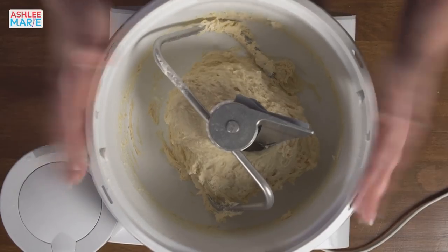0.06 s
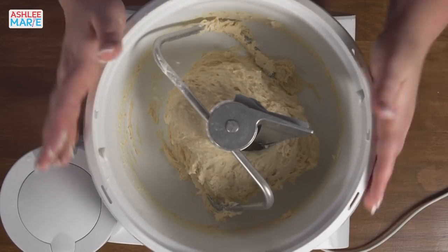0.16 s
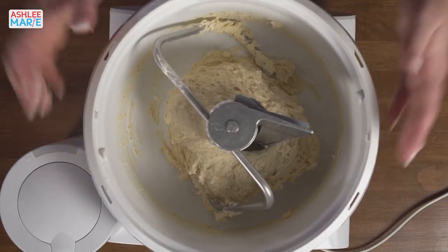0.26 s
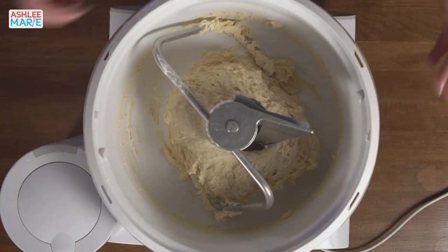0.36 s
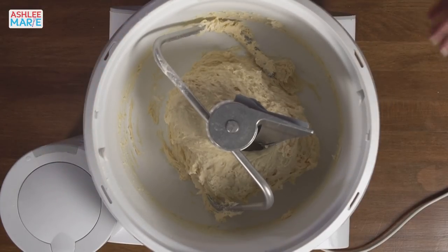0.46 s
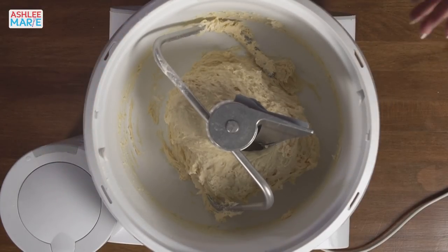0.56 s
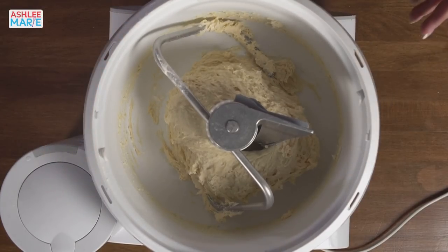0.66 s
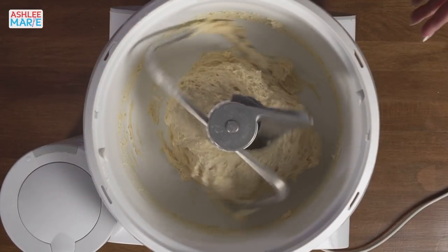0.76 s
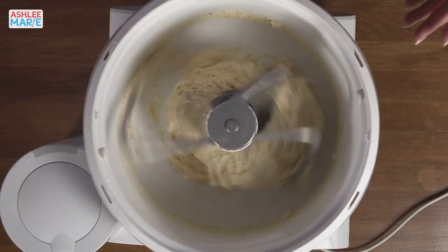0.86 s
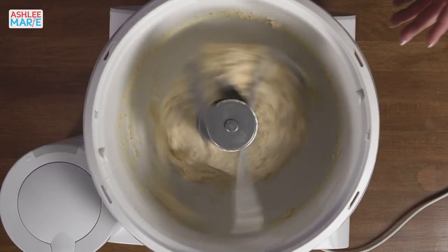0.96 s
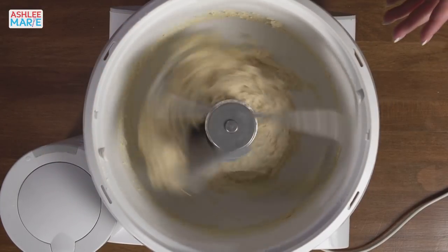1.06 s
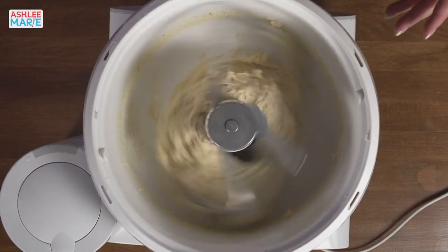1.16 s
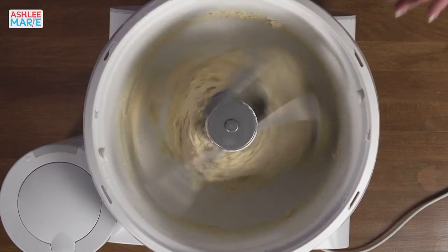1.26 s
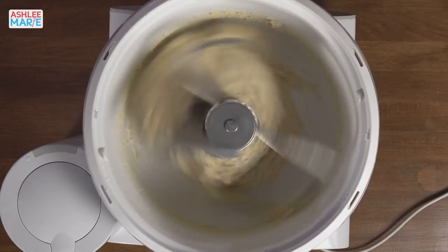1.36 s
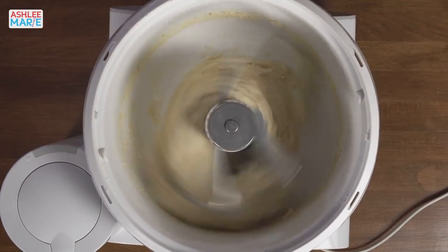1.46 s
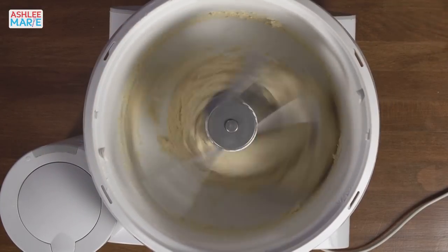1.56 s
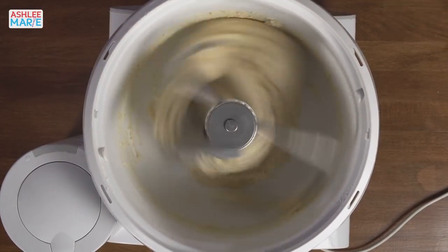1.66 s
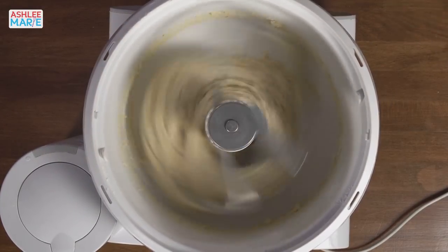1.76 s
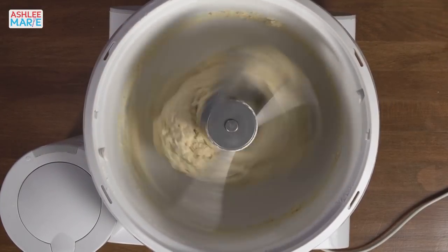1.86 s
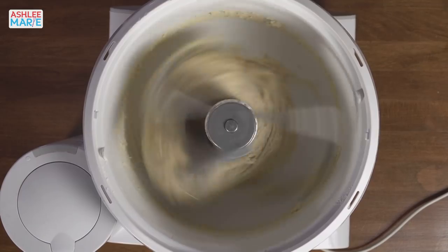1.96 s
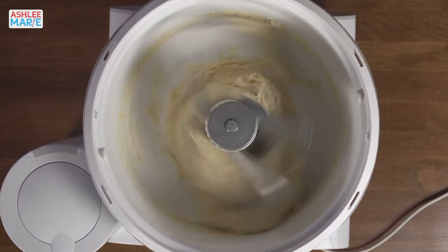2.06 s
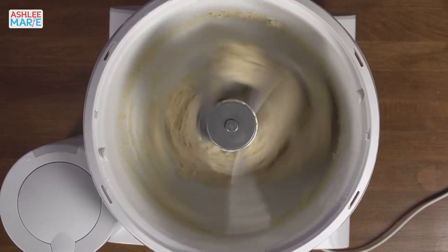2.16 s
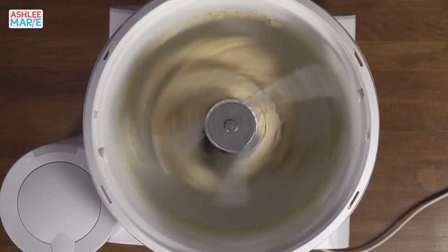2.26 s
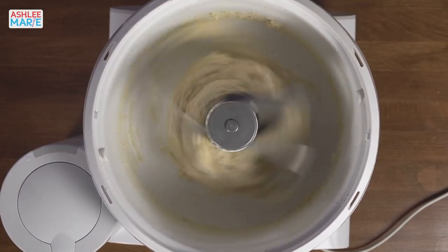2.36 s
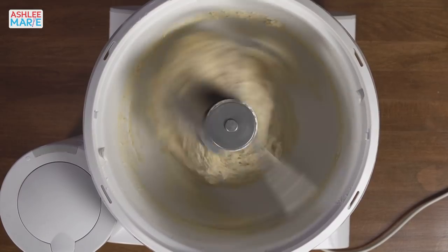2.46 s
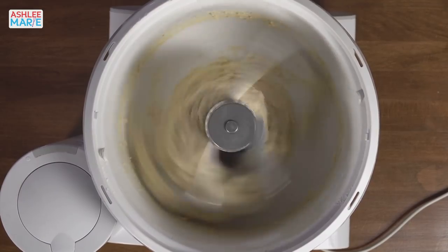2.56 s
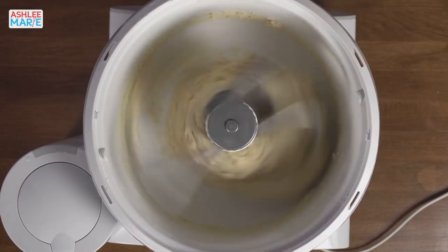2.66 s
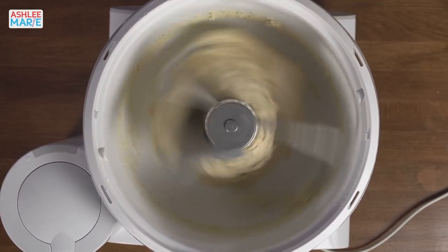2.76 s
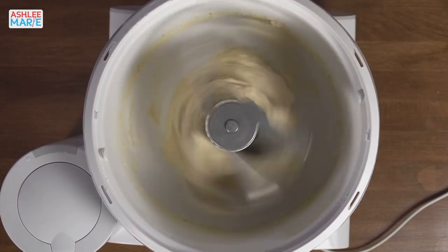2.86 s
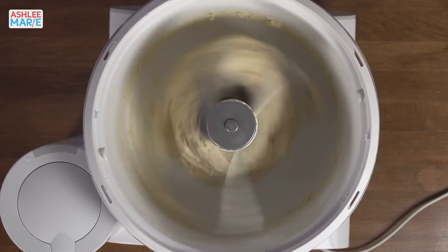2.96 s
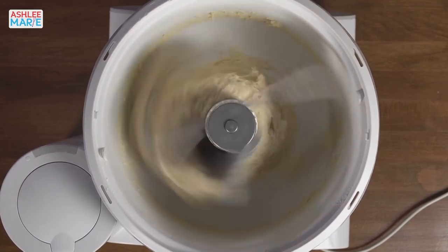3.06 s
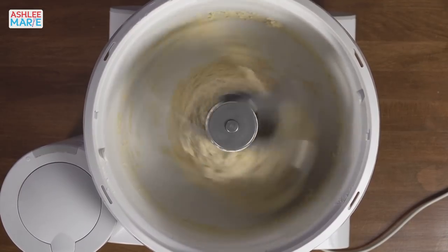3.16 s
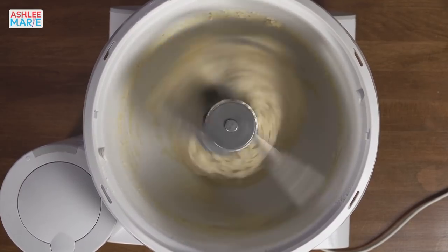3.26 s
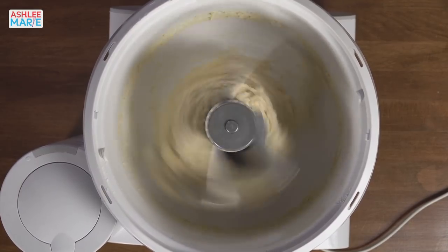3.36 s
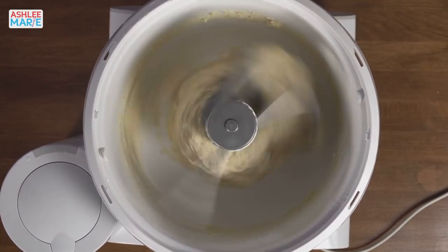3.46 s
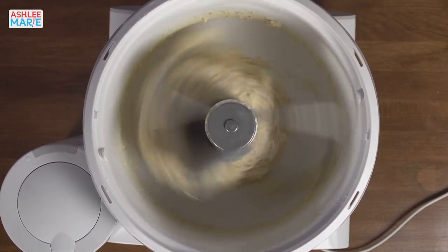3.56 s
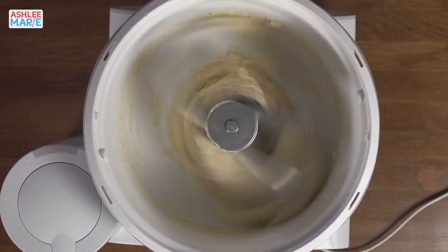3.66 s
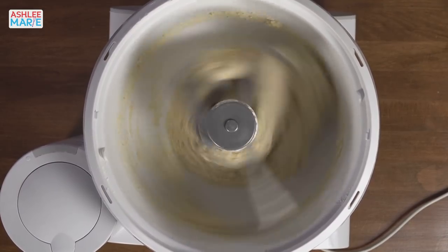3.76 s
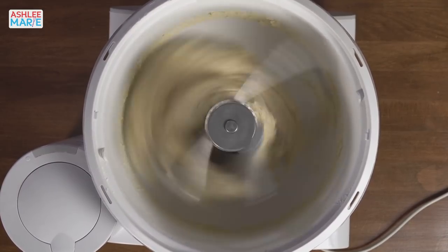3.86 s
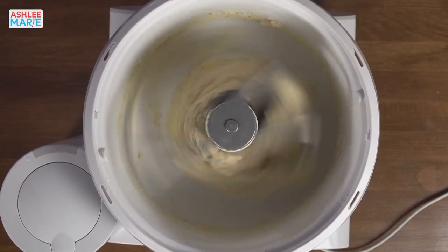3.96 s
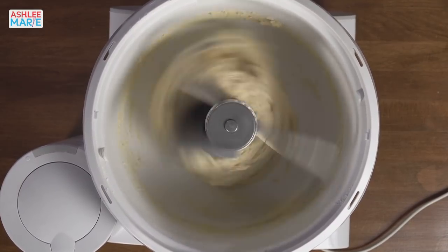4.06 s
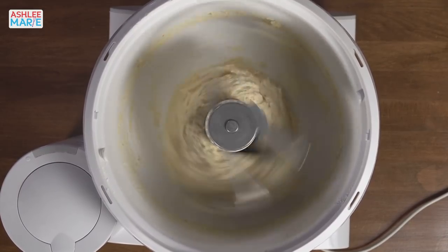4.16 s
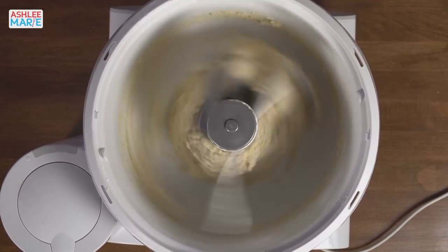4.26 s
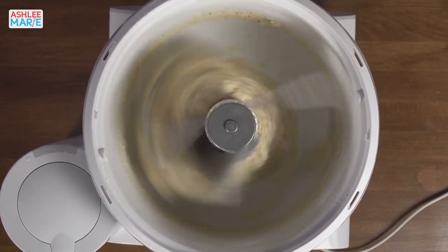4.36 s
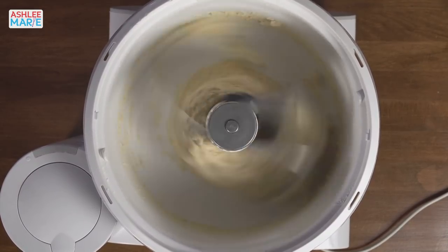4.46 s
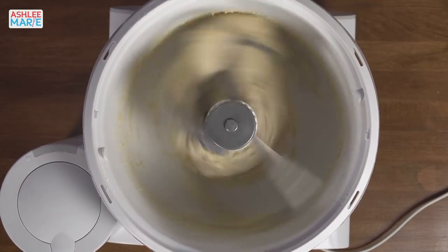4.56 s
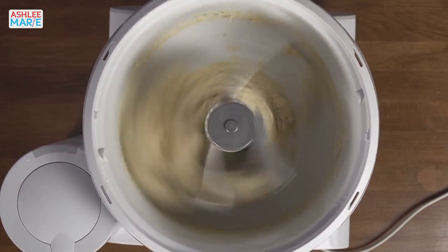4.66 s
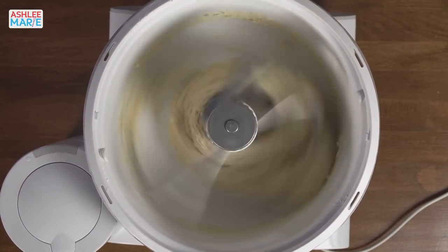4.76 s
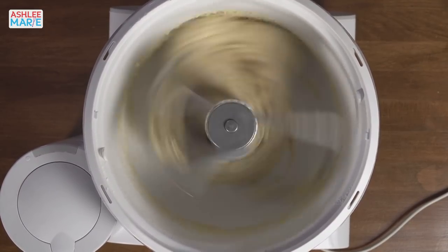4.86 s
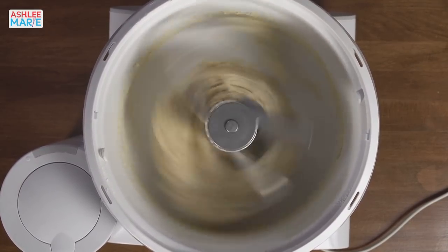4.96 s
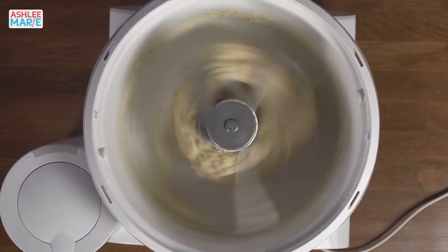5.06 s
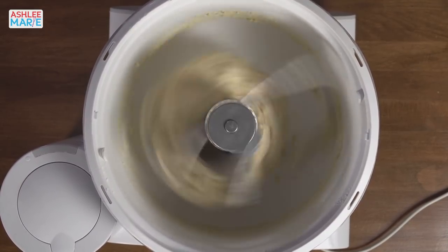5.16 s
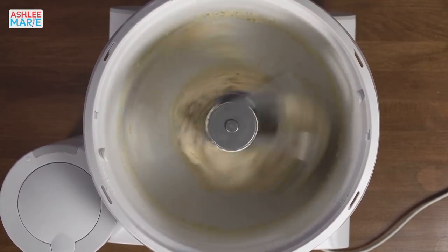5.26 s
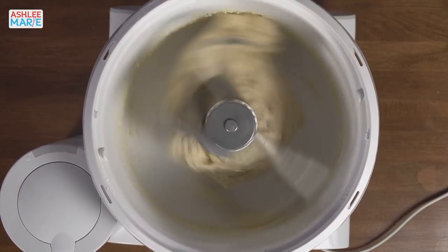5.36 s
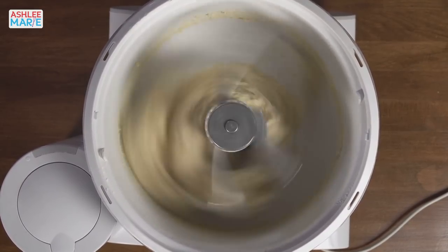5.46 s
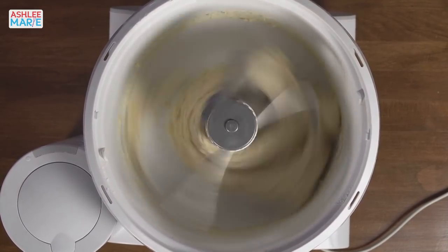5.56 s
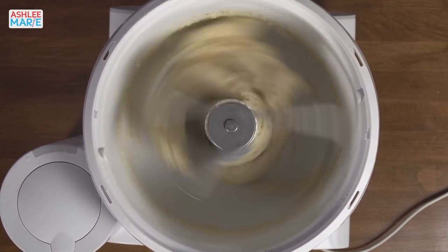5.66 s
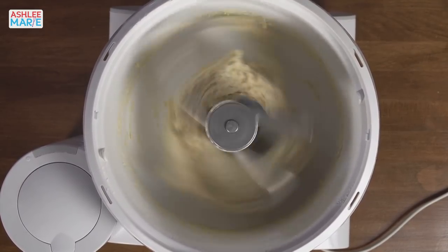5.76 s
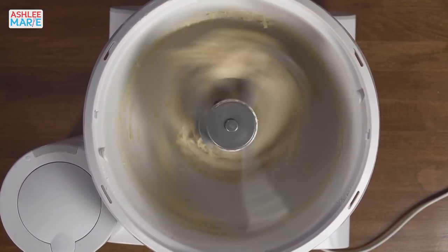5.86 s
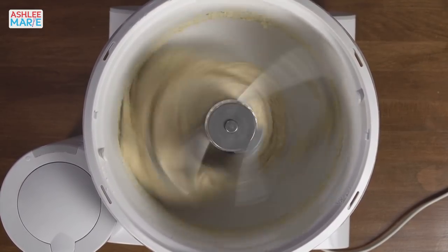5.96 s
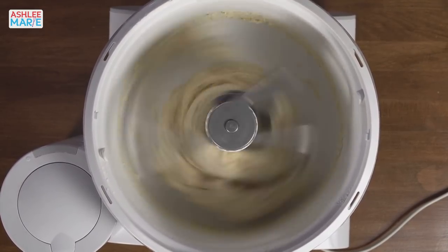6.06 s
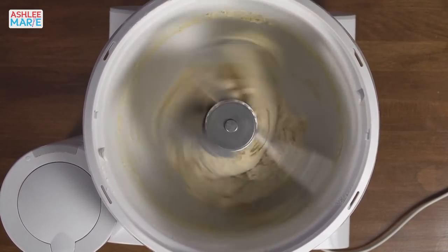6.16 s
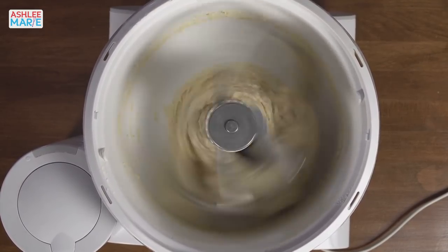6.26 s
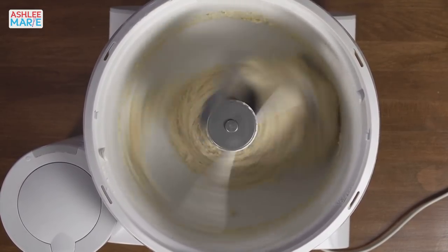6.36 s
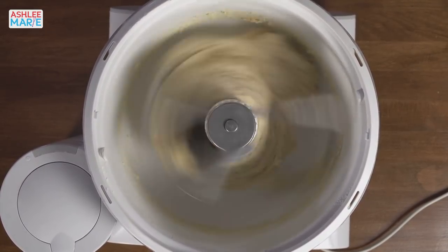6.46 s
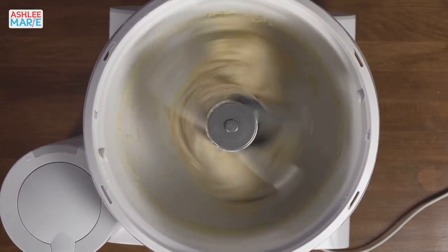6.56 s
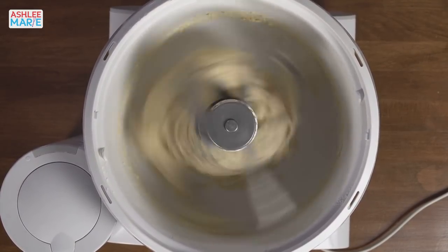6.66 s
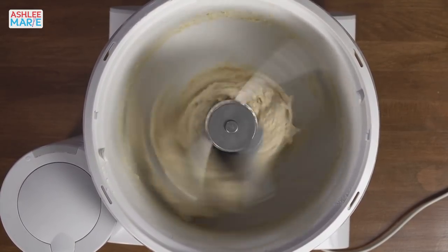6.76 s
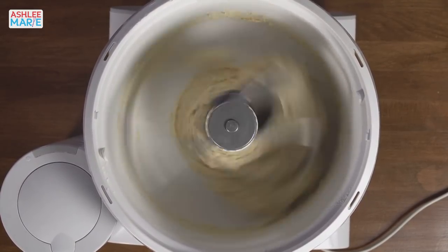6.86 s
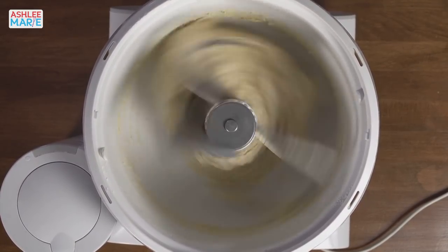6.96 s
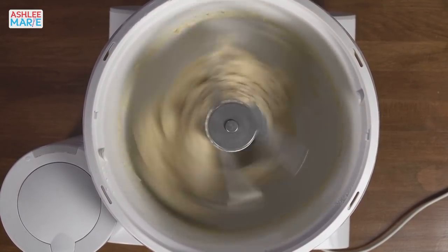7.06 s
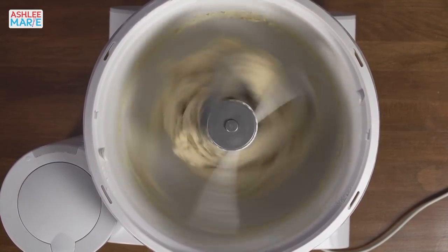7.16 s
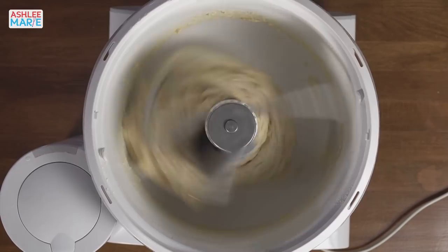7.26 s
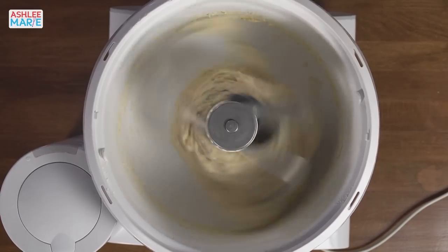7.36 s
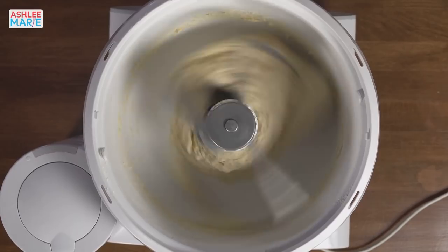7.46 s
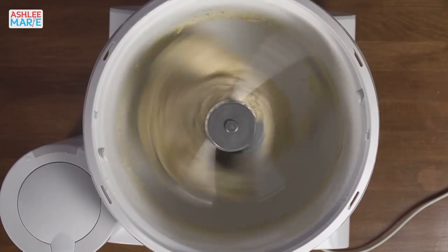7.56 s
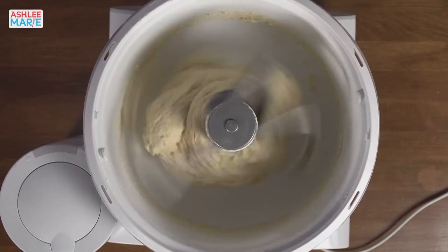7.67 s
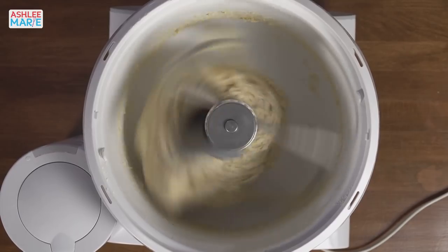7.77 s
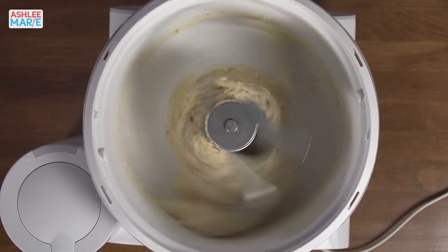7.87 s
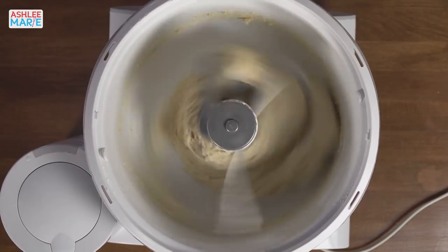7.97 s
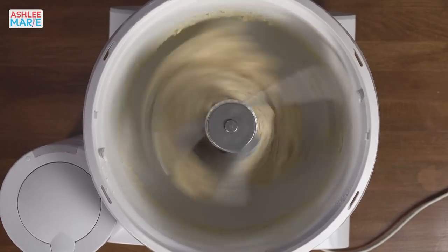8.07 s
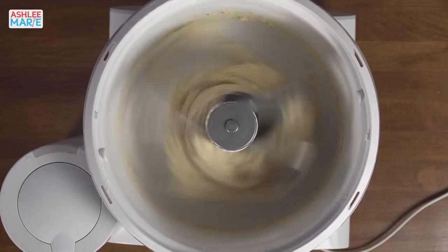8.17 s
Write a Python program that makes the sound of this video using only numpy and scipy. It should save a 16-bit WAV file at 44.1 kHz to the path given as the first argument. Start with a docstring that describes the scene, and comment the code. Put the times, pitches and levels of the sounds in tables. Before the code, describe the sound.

Close to a stand mixer in a quiet kitchen: a hard plastic bowl lock snaps right away, and after a brief pause with a faint finger touch, the dial clicks up four notches. The motor buzzes and climbs fast in pitch, then settles into a loud gritty roar with airy hiss and a piercing high whine. The dough makes the pitch sag and recover slightly as it runs to the end without stopping.

```python
"""Stand mixer kneading dough on a kitchen counter, close to a stereo pair of microphones.
One shaft speed drives fan whine, shaft orders, gear tones and gear and air noise; it climbs in a spurt
and a creep, then sags and recovers as the dough drags. First the plastic bowl snaps home and the dial
clicks up four notches: noise bursts and bowl modes with a kitchen tail. Windings buzz during the climb."""
import sys
import numpy as np
from scipy import signal
from scipy.fft import rfft, irfft, next_fast_len
from scipy.io import wavfile
from scipy.ndimage import uniform_filter1d

SR = 44100
rng = np.random.default_rng(int(sys.argv[2]) if len(sys.argv) > 2 else 0)


def unload_audio(sound):
    """Save the sound as a 16-bit wav file, at the path given as the first command line argument."""
    columns = np.transpose(np.atleast_2d(sound))
    # keep every value between -1 and 1, then stretch to whole-number steps
    steps = np.round(np.clip(columns, -1, 1) * 32767)
    wavfile.write(sys.argv[1], SR, steps.astype(np.int16))


N = 361619

# still room spectrum: freq_hz, relative_density_db
QUIET_SPECTRUM = [(20, -7), (100, -21), (250, -5), (550, 0), (1000, -1), (2500, -8.5), (6000, -10.5),
                  (15000, -25)]
# kitchen reverberation: freq_hz, t60_s
KITCHEN_T60 = [(150, 0.35), (600, 0.39), (1800, 0.47), (4000, 0.33), (8000, 0.38), (15000, 0.27)]
# microphone balance: freq_hz, left_minus_right_db
MIC_BALANCE = [(60, 1), (120, 0), (220, -4), (700, -4), (1300, -5), (1800, -3), (4400, -2), (8000, -2),
               (11000, -3), (14000, -1.5)]
# microphone likeness: freq_hz, likeness_0_to_1
MIC_LIKENESS = [(60, 0), (130, 0.059), (220, 0.67), (600, 0.2), (1500, 0.17), (4000, 0.49), (14000, 0.045)]
# bowl lock and dial notches: start_s, relative_level_db, thump_re_snap_db, left_minus_right_db,
# snap_decay_s, catch_pitch_hz
CLICKS = [(0.0221, -30.5, -11, -4, 0.005, 3200), (0.0293, -37, -2, -3, 0.004, 3000),
          (0.0321, -17.5, -15, -10, 0.0034, 3620), (0.0361, -11, -12.5, -2, 0.0016, 4840),
          (0.044, -32.5, 2, -19, .004, 1400), (0.0488, -31, 6, -14, 0.0036, 1400),
          (0.525, -58.5, 5, -15, .004, 950), (0.667, -24.5, -11, 0, 0.0048, 2250),
          (0.679, -32, -3, -9, 0.0076, 5800), (0.7168, -30, -4, -1, 0.0062, 7500),
          (0.728, -30, -6, -8, 0.0088, 5700), (0.762, -30.5, -4, -7, 0.0055, 7400),
          (0.771, -29, -6, -9, 0.0066, 5800), (0.8005, -27.5, -8.5, -2, 0.0052, 4200)]
# snap spectrum: freq_hz, relative_density_db
SNAP_SPECTRUM = [(60, -32), (300, -11), (900, 0), (1400, -2), (2000, 0), (3800, 1), (5000, 1.5), (8000, -4),
                 (12000, -9.5), (16000, -17)]
# thump spectrum: freq_hz, relative_density_db
THUMP_SPECTRUM = [(30, -36), (100, -32), (160, -7.5), (280, -6.5), (480, -6), (780, 1.5), (1030, -7),
                  (1430, 2), (2200, -12), (5000, -26), (16000, -48)]
# plastic bowl modes: pitch_hz, relative_level_db, t60_s
BOWL_MODES = [(227, -12, .3), (339, -8, .27), (411, -8, .18), (590, -16, 0.25), (784, -2, 0.22),
              (881, -8, 0.39), (1140, -8, .35), (1390, -10, 0.28), (1500, -2, 0.28), (1760, 1, .18),
              (1838, -2, 0.33), (2030, -6, 0.29), (2180, -9, 0.27), (2380, -8, .22)]
# fingertips on the dial: start_s, level_db
TOUCHES = [(0.472, -63), (0.527, -49)]
# soft touch spectrum: freq_hz, relative_density_db
TOUCH_SPECTRUM = [(40, -20), (150, -8), (300, 0), (550, 3), (900, -9), (1500, -18), (4000, -34),
                  (16000, -50)]
# pace the dough allows, before smoothing: time_s, shaft_hz
DOUGH_PACE = [(1.42, 260.3), (1.6, 258.2), (1.8, 259.0), (2.02, 261.7), (2.15, 259.2), (2.35, 259.6),
              (2.51, 262.6), (2.87, 261.0), (3.06, 263.2), (3.39, 263.0), (3.48, 264.2), (3.61, 266.0),
              (3.74, 262.1), (3.88, 260.3), (4.03, 260.6), (4.17, 261.7), (4.3, 262.6), (4.53, 263.0),
              (4.64, 259.8), (4.9, 256.8), (5.12, 257.3), (5.32, 257.9), (5.6, 255.6), (5.89, 258.6),
              (6.04, 255.2), (6.2, 257.2), (6.31, 258.7), (6.41, 256.7), (6.62, 255.6), (6.78, 258.1),
              (6.92, 258.0), (7.1, 256.5), (7.3, 259.3), (7.43, 258.0), (7.56, 257.0), (7.7, 258.6),
              (7.84, 260.8), (7.92, 258.5), (8.15, 258.5)]
# mains buzz of the windings: pitch_hz, relative_level_db
WINDING_BUZZ = [(120, -74), (240, -46.5), (360, -61), (480, -47.5), (600, -52), (2160, -52)]
# gear grind spectrum: freq_hz, relative_density_db
GRIND_SPECTRUM = [(20, -23), (110, -18), (160, -9), (215, -2), (450, -2.5), (700, 2.5), (1050, 0.8),
                  (1400, 1.4), (1800, 2.2), (2600, -3), (4000, -8), (8000, -22), (16000, -45)]
# cooling air spectrum: freq_hz, relative_density_db
AIR_SPECTRUM = [(20, -18.5), (800, -12), (2500, -3), (4000, 1), (5300, 1), (6400, 2.5), (7600, 1),
                (9000, 1), (10500, -3.5), (11500, -5), (12700, -4.5), (13200, -7.5), (14000, -8),
                (15300, -12.5)]
# housing and bowl resonances: centre_hz, width_hz, gain_db, left_minus_right_db
HOUSING_MODES = [(311, 29, 4.5, -0.5), (403, 29, 3, -1.5), (554, 70, 2.5, 4), (625, 30, -2.5, -4),
                 (840, 170, 1, 0.5), (934, 59, 3.5, 3), (1040, 87, 1.5, -3.5), (1250, 70, 3, -2.5),
                 (1730, 130, 2.5, -0.5), (2130, 130, 3.5, -2.5), (2720, 160, 4, -1.5), (2990, 310, 3, 5),
                 (3390, 180, 1.5, -5.5), (3544, 130, 2.5, -2.5), (4300, 380, 7.5, -2), (4760, 360, 5, 1.5),
                 (5620, 190, 2, 1), (6170, 46, 3.5, 3), (6310, 680, 4.5, -4.5), (6370, 37, 3.5, -3),
                 (6580, 65, 2.5, -0.5), (7140, 310, 4, 1), (7660, 360, -1.5, -1), (8500, 390, 1.5, 0.5),
                 (10440, 380, 2, -5.5)]
# whole shaft orders: shaft_multiple, full_speed_db, left_minus_right_db, gain_db_per_10_hz (near the top)
SHAFT_ORDERS = [(1, -49, -7, 7), (2, -53, -5, -5), (3, -49, -5, 10), (4, -45, -8.5, -1), (5, -40, -7, 3.5),
                (6, -53, -10, -2), (7, -50, 1, 2), (8, -39.5, -6.5, 5.5), (9, -52, -21, -2),
                (11, -57, -6, 0), (12, -44.5, -7, -0.5), (15, -51, -8, -3), (13, -51, -3, 3),
                (16, -46, -4, 3), (17, -51, -3, 4), (22, -52, -6, 2), (24, -51, 0, 1), (25, -53, -6, 2),
                (46, -54, -10, -1)]
# gear train and bearing tones: shaft_multiple, full_speed_db, left_minus_right_db,
# gain_db_per_10_hz (near the top), phase_blur_rad
GEAR_TONES = [(1.469, -50.5, -7.5, 10, 0.54), (2.434, -52, -10, -3, 0.4), (3.178, -49, -12, 16, 0.39),
              (3.655, -50, -16, -5, 0.55), (4.124, -54, -7, -2, 0.66), (7.86, -48, -2, 0, 1.8),
              (8.33, -50.5, -6, 9, 1.4), (38, -50, 2, -1, 2.6), (53.2, -55, 0, 6, 3)]
# shaft-speed ranges where a tone swells or fades: shaft_multiple, from_shaft_hz, to_shaft_hz, gain_db
TONE_RANGES = [(1, 174, 250, 11.5), (1, 178, 221, 2.5), (2, 230, 248, -9), (2.43, 146, 232, 7),
               (2.43, 140, 208, 3), (3, 217, 250, -1), (4, 160, 196, -1), (4, 210, 256, 5),
               (4, 201, 246.5, 6.5), (5, 184, 220, 6.5), (5, 220, 240, -10), (5, 259.3, 270, -8.5),
               (8, 83, 168, 8), (8, 180, 240, -21), (9, 230, 244, 10.5), (11, 130, 190, 14),
               (12, 110, 185, 13), (12, 185, 214, 7), (12, 226, 237, 4), (13, 115, 165, 16),
               (15, 216, 235, 6)]
# standing waves met by the fan whine: pitch_hz, left_db, right_db, left_lead_rad
STANDING_WAVES = [(3900, -56.9, -54.7, 3.0), (4240, -43.6, -29.4, 1.7), (4550, -31.8, -35.3, 3.2),
                  (4800, -38.0, -26.1, 1.7), (5000, -34.8, -32.1, 2.7), (5200, -44.7, -43.3, 2.0),
                  (5400, -41.7, -36.6, 2.4), (5510, -32.3, -31.1, 2.5), (5590, -28.7, -30.8, 2.7),
                  (5690, -31.5, -33.0, 2.2), (5725, -37.1, -34.2, 2.9), (5757, -28.9, -26.2, 2.8),
                  (5790, -35.1, -35.8, 2.6), (5825, -30.4, -29.2, 2.2), (5865, -26.9, -41.0, 2.3),
                  (5889, -25.5, -35.9, 2.0), (5906, -25.4, -32.7, 3.5), (5920, -22.4, -35.4, 4.6),
                  (5932, -25.5, -28.8, 6.9), (5944, -24.7, -24.4, 7.4), (5958, -27.5, -25.6, 8.2),
                  (5971, -27.9, -31.3, 7.3), (5986, -26.7, -20.2, 7.4), (6003, -29.8, -21.6, 8.1),
                  (6018, -34.0, -23.7, 8.9), (6040, -25.2, -24.2, 9.0), (6067, -25.2, -21.1, 7.9)]

T = np.arange(N) / SR
SIZE = next_fast_len(N, True)
HZ = np.fft.rfftfreq(SIZE, 1 / SR)

FULL_HZ = 258  # full shaft speed, turns per second
START_S, SPURT_S, CREEP_S, CREEP_SHARE = .665, .1947, .8063, .26786
GRIND_DB, GRIND_DROP_DB = -30, 15  # at full speed; drop at standstill
AIR_DB, AIR_DROP_DB = -24, 38.5
TEETH_PER_S, TEETH_SHARE = 160, .1  # ticks of gear teeth, share of power
SPARKS_PER_S, SPARKS_SHARE = 500, .09  # ticks of sparking brushes, share of power
ECHO_SPACING_HZ, ECHO_RIPPLE_DB = 35, 1.4


def amp(db):
    """Decibels to gain."""
    return np.exp(np.asarray(db) * np.log(10) / 20)


def unit(x):
    """Scale to rms 1."""
    return x / np.sqrt(np.mean(x ** 2) + 1e-20)


def read(points, hz):
    """Spectrum table on a log-frequency axis."""
    f, value = np.transpose(points)
    return np.interp(np.log(hz + 1), np.log(f + 1), value)


def bump(hz, centre_hz, width_hz):
    """Resonance peak of height 1."""
    return 1 / (1 + (2 * (hz - centre_hz) / width_hz) ** 2)


def split(db):
    """Half of a left-right difference to each side, in dB."""
    return np.array([[.5], [-.5]]) * db


def pan(db):
    """Left and right gains of constant power."""
    gains = amp(split(db))
    return gains / np.sqrt(np.mean(gains ** 2, 0))


def highpass(x, order, cutoff_hz):
    """Butterworth high-pass."""
    return signal.sosfilt(signal.butter(order, cutoff_hz, "highpass", fs=SR, output="sos"), x)


def drift(rate_hz):
    """Slow random wander of rms 1."""
    knots = rng.standard_normal(SIZE // 100)
    hz = np.fft.rfftfreq(len(knots), T[-1] / len(knots))
    slow = unit(irfft(rfft(knots) / (1 + (hz / rate_hz) ** 2), len(knots)))
    return np.interp(T, np.linspace(0, T[-1], len(slow)), slow)


def white_noise():
    """White noise, two channels."""
    return rng.standard_normal((2, SIZE))


def gritty(per_s, share):
    """White noise with a share of its power in separate ticks."""
    hits = rng.random(SIZE) < per_s / SR
    ticks = unit(hits * rng.uniform(-1.01, 1, (2, SIZE)))
    return np.sqrt(1 - share) * white_noise() + np.sqrt(share) * ticks


def stereo_noise(white, colour, lead_samples=4):
    """Coloured noise of rms 1, partly alike in both microphones; the shared part leads on the left."""
    a, b = rfft(white)
    same = np.clip(read(MIC_LIKENESS, HZ), 0, 1)
    lead = np.exp(2j * np.pi * HZ * lead_samples / SR)
    left = same * a * lead + np.sqrt(1 - same ** 2) * b
    return unit(irfft(np.array([left, a]) * colour, SIZE)[:, :N])


def still_room(level_db=-67):
    """Steady coloured noise of the quiet room."""
    return amp(level_db) * stereo_noise(white_noise(), amp(read(QUIET_SPECTRUM, HZ)))


def kitchen(x, wet_db=-12, onset_s=0.0091):
    """Diffuse noise tail with its own decay time at each frequency."""
    hz, t, z = signal.stft(rng.standard_normal((2, SR // 2)), SR, nperseg=256)
    decay = amp(-60 * t / read(KITCHEN_T60, hz)[:, None])
    tail = signal.istft(z * decay, SR, nperseg=256)[1]
    tail *= np.clip(np.arange(tail.shape[1]) / SR / onset_s, 0, 1)
    wet = signal.fftconvolve(x, tail / np.linalg.norm(tail[0]), axes=1)[:, :N]
    return x + amp(wet_db) * wet


def burst(colour, decay_s, attack_s=0.00027):
    """Short dense ring: coloured noise under a fast-rising exponential decay."""
    t = np.arange(4096) / SR
    spectrum = amp(read(colour, np.fft.rfftfreq(len(t), 1 / SR)))
    ring = irfft(rfft(rng.standard_normal((2, len(t)))) * spectrum)
    return unit(ring) * np.exp(-t / decay_s) * (1 - np.exp(-t / attack_s))


def add_at(out, start_s, sound):
    """Mix a sound in place from its start time."""
    out[:, round(start_s * SR):][:, :sound.shape[-1]] += sound


def fingers(decay_s=0.024, side_db=-7):
    """Soft skin pushes the hollow body without a snap."""
    out = np.zeros((2, N))
    for start_s, level_db in TOUCHES:
        add_at(out, start_s, amp(level_db) * pan(side_db) * burst(TOUCH_SPECTRUM, decay_s))
    return out


def catch_snap(decay_s, catch_hz, peak_db=5, relative_width=.22):
    """Bright snap in which the catch's own pitch stands out."""
    hz = np.geomspace(60, 16000, 200)
    level_db = read(SNAP_SPECTRUM, hz) + peak_db * bump(hz, catch_hz, relative_width * catch_hz)
    return burst(np.transpose([hz, level_db]), decay_s)


def bowl_ring(spread=0.0183, count=4):
    """Bowl modes, each a cluster of close decaying partials."""
    t = np.arange(SR // 2) / SR
    ring = 0
    for hz, db, t60_s in BOWL_MODES:
        for _ in range(count):
            detune = 1 + spread * rng.uniform(-1, 1, (2, 1))
            partial = np.sin(2 * np.pi * hz * detune * t) * rng.choice([-1, 1])
            ring = ring + amp(db - 60 * t / t60_s) * partial
    return ring / np.sqrt(count)


def clicks(thump_decay_s=0.0064, level_db=2, ring_db=-21):
    """Each catch snaps brightly, thumps the hollow body and rings the bowl."""
    out = np.zeros((2, N))
    ring = amp(ring_db) * bowl_ring()
    for start_s, db, thump_db, side_db, snap_s, catch_hz in CLICKS:
        thump = burst(THUMP_SPECTRUM, thump_decay_s)
        crossed_thump = thump + .5 * thump[::-1]  # each side leaks into the other
        hit = catch_snap(snap_s, catch_hz) + amp(thump_db) * crossed_thump
        gain = amp(db + level_db) * pan(side_db)
        add_at(out, start_s, gain * hit)
        add_at(out, start_s, gain * amp(thump_db) * ring)
    return highpass(out, 2, 135)


def shaft_speed(hunting_hz=0.056, inertia_s=.07):
    """Turns per second: spurt and creep toward the dough's pace, smoothed by rotor inertia."""
    since = np.maximum(T - START_S, 0)
    lag = CREEP_SHARE * np.exp(-since / CREEP_S) + (1 - CREEP_SHARE) * np.exp(-since / SPURT_S)
    time_s, shaft_hz = np.transpose(DOUGH_PACE)
    pace = uniform_filter1d(np.interp(T, time_s, shaft_hz), size=round(inertia_s * SR))
    return np.maximum(pace + hunting_hz * drift(17.0), 0) * np.maximum(1 - lag, 0)


def power_on():
    """Short fade-in as the motor is switched on."""
    return np.clip((T - 0.675) / 0.013, 0, 1)


def counter_rumble(speed, level_db=-61, centre_hz=50, width_hz=110, growth=4):
    """Turning dough shakes the counter: low noise rising steeply with speed."""
    shake = stereo_noise(white_noise(), bump(HZ, centre_hz, width_hz))
    return amp(level_db) * (speed / FULL_HZ) ** growth * shake


def windings(speed, level_db=1, side_db=-5):
    """Starting current buzzes at mains harmonics and fades as speed rises."""
    current = power_on() * np.clip(1 - speed / FULL_HZ, 0, 1)
    buzz = sum(amp(db) * np.sin(2 * np.pi * hz * T) for hz, db in WINDING_BUZZ)
    return amp(level_db) * pan(side_db) * current * np.sqrt(2) * buzz


def straining_gears(speed, level_db=-38, ring_hz=3500, width_hz=330, worst_hz=238, span_hz=42, side_db=-4):
    """Driven teeth rasp on one housing resonance, loudest near one shaft speed."""
    rasp = stereo_noise(gritty(TEETH_PER_S, TEETH_SHARE), bump(HZ, ring_hz, width_hz))
    return amp(level_db) * pan(side_db) * bump(speed, worst_hz, span_hz) * rasp


def echo_ripple():
    """Counter and wall echoes: fine random peaks and dips per ear, in dB."""
    knots = np.arange(0, SR / 2, ECHO_SPACING_HZ)
    rows = rng.standard_normal((2, len(knots)))
    ripple = np.array([np.interp(HZ, knots, row) for row in rows])
    return ECHO_RIPPLE_DB * ripple * np.clip(HZ / 2000, 0, 1)


def running_noise(speed, churn_db=0.74, chatter_db=0.57, flutter_db=0.62, pulsing=0.025):
    """Teeth, brushes and air roar through the housing, rising with speed, pulsing twice per turn."""
    housing_db = sum(bump(HZ, f, w) * (db + split(side_db)) for f, w, db, side_db in HOUSING_MODES)
    shell = amp(housing_db + echo_ripple()) * pan(read(MIC_BALANCE, HZ))
    climbing = 1 - speed / FULL_HZ
    pulse = 1 + pulsing * np.cos(2 * np.pi * np.cumsum(2 * speed) / SR)

    grind = stereo_noise(gritty(TEETH_PER_S, TEETH_SHARE), shell * amp(read(GRIND_SPECTRUM, HZ)))
    grind_db = GRIND_DB - GRIND_DROP_DB * climbing + churn_db * drift(16) + chatter_db * drift(90)

    air = stereo_noise(gritty(SPARKS_PER_S, SPARKS_SHARE), shell * amp(read(AIR_SPECTRUM, HZ)))
    air_db = AIR_DB - AIR_DROP_DB * climbing + flutter_db * drift(30)
    return power_on() * pulse * (grind * amp(grind_db) + air * amp(air_db))


def tone_range_db(multiple, speed, edge_hz):
    """Rise or fall in dB of one tone within its shaft-speed ranges."""
    return sum(gain_db / 2 * (np.tanh((speed - low) / edge_hz) - np.tanh((speed - high) / edge_hz))
               for k, low, high, gain_db in TONE_RANGES if abs(k - multiple) < 1 / 10)


def shaft_tones(speed, angle, waver_db=2.5, order_blur_rad=0.37, backlash_rad=.017, rattle_rad=.09,
                ripple_rad=0.17, ripple_hz=120, clatter_db=3, growth=1.97, edge_hz=0.36, climb_edge_hz=32,
                calm=.6, lead_s=.0001):
    """Unbalance and gear mesh give wavering tones; rattling ones swell when the load lets go."""
    out = np.zeros((2, N))
    slack = np.maximum(speed - FULL_HZ, -8) / 10
    climbing = np.maximum(1 - speed / FULL_HZ, 0)
    # gear play blurs the high tones most
    loose_angle = angle + backlash_rad * drift(14) + rattle_rad * climbing * drift(70)
    # starting current shakes the shaft twice per mains cycle, splitting tones into strands
    loose_angle = loose_angle + ripple_rad * climbing * np.sin(2 * np.pi * ripple_hz * T)
    size = (speed / FULL_HZ) ** growth * np.clip((T - 0.7) / 0.07, 0, 1)
    size = size * amp(clatter_db * climbing * drift(60))
    # range edges are softer the further the shaft is below full speed
    edge = edge_hz + climb_edge_hz * climbing
    orders = [(round(k), db, side_db, slack_db, order_blur_rad) for k, db, side_db, slack_db in SHAFT_ORDERS]
    for multiple, db, side_db, slack_db, blur_rad in orders + GEAR_TONES:
        range_db = tone_range_db(multiple, speed, edge)
        unrest = 1 - calm * np.clip(range_db / 10, 0, 1)  # a swelling tone is steadier
        level_db = db + slack_db * slack + range_db + unrest * waver_db * drift(10.5)
        phase = multiple * loose_angle + unrest * blur_rad * drift(11.5) + 2 * np.pi * rng.random()
        lead = 2 * np.pi * multiple * speed * lead_s
        tone = np.cos(np.array([phase + lead, phase]))
        out += pan(side_db) * np.sqrt(2) * size * amp(level_db) * tone
    # the small housing hardly radiates the lowest notes
    return highpass(out, 4, 165)


def fan_whine(speed, angle, blades=23, shimmer_db=1.73, climb_shimmer_db=22, smear_rad=0.16, rattle_rad=5):
    """Blades pass the vents in one piercing tone, rough in the climb, shaped per ear by standing waves."""
    hz, *columns = np.transpose(sorted(STANDING_WAVES))
    left_db, right_db, left_lead = [uniform_filter1d(np.interp(blades * speed, hz, column), size=1000)
                                    for column in columns]
    climbing = np.clip(1 - speed / FULL_HZ, 0, .08)
    phase = blades * angle + rattle_rad * climbing * drift(60)
    ears = []
    for db, lag in ((left_db, 0), (right_db, left_lead)):
        level_db = db + (shimmer_db + climb_shimmer_db * climbing) * drift(21)
        ears.append(amp(level_db) * np.cos(phase - lag + smear_rad * drift(36)))
    return np.sqrt(2) * np.array(ears) * np.clip((T - 0.8) / .1, 0, 1)


def scene():
    """One shaft speed drives the whole machine; only clicks and touches get the kitchen tail."""
    speed = shaft_speed()
    angle = 2 * np.pi * np.cumsum(speed) / SR
    noises = counter_rumble(speed) + straining_gears(speed) + running_noise(speed)
    tones = windings(speed) + shaft_tones(speed, angle) + fan_whine(speed, angle)
    return still_room() + kitchen(clicks() + fingers()) + noises + tones


def record(dry):
    """Band limit: linear-phase low-pass at 15250 Hz."""
    edge = signal.firwin(511, 15250, window=("kaiser", 9), fs=SR)
    return signal.oaconvolve(dry, edge[None], "same")


dry = scene()
out = record(dry)
unload_audio(out)
```